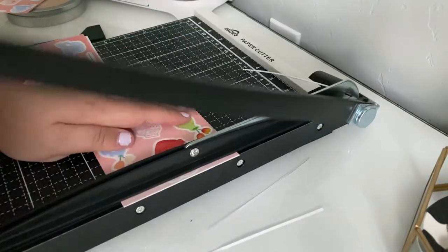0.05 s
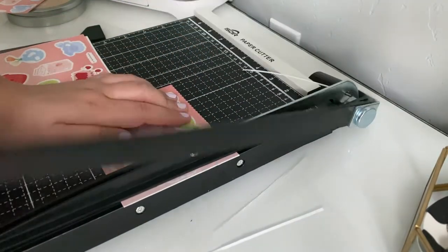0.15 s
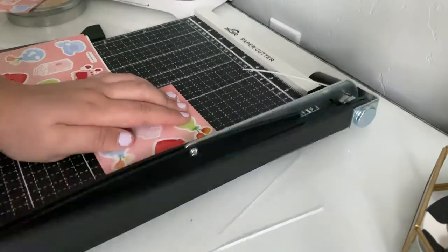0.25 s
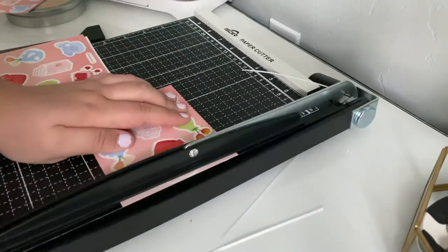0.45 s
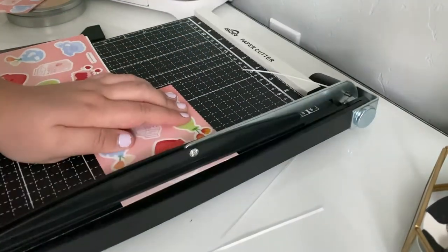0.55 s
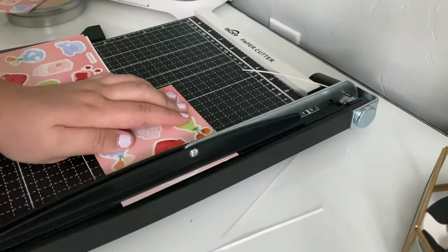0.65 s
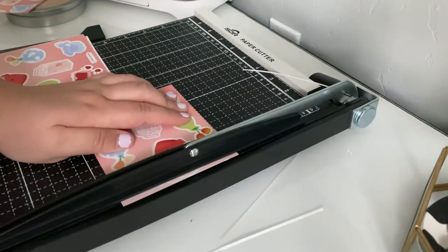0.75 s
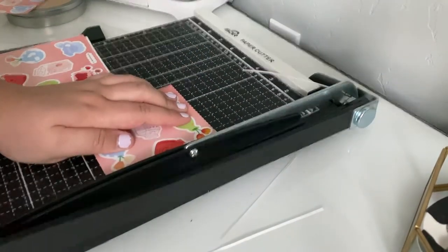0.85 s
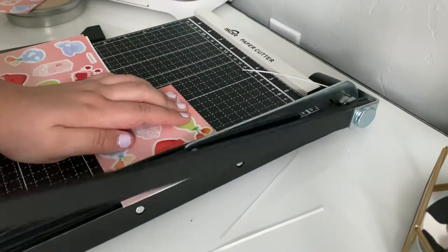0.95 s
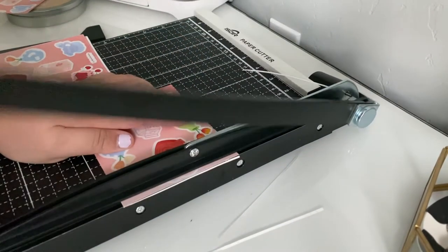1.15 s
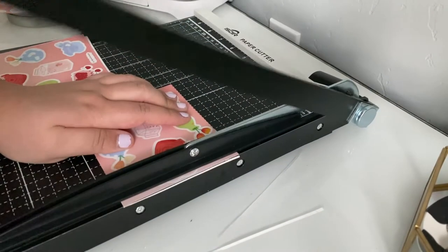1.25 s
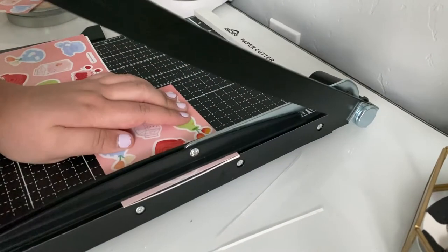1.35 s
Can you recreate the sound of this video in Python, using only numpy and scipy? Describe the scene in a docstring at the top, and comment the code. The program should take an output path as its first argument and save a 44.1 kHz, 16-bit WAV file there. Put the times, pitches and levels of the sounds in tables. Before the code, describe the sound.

Close by on a table in a small room, a paper cutter blade shears a sheet with a short crunch and thuds home. After a brief pause it lifts with a softer metallic scrape, ending in a light click.

```python
"""A guillotine paper cutter on a table, over the low noise of a small room. The blade comes down,
crunches through a sheet and thuds home at 0.35 s. The arm shifts once near 0.63 s, unsticks at 0.87 s,
scrapes back up along the steel edge and clicks at the top at 1.29 s. Throughout, the friction of the
blade rings the steel frame, and the pushes of the arm ring the hollow base."""
import sys
import numpy as np
from scipy import signal
from scipy.fft import rfft, irfft
from scipy.io import wavfile
from scipy.ndimage import uniform_filter1d

SR = 44100
rng = np.random.default_rng(int(sys.argv[2]) if len(sys.argv) > 2 else 0)


def file_out(sig):
    """Save sig as 16-bit WAV at sys.argv[1]."""
    # one column per channel
    cols = np.atleast_2d(sig).T
    # limit, then scale
    lim = np.clip(cols, -1, 1)
    pcm = np.round(lim * 32767).astype(np.int16)
    wavfile.write(sys.argv[1], SR, pcm)


N = 61739
T = np.arange(N) / SR
FFT_SIZE = 2 ** 17
HZ = np.maximum(np.arange(FFT_SIZE // 2 + 1) * SR / FFT_SIZE, 1)


def from_db(db):
    """Decibels to gain."""
    return 10 ** (np.asarray(db) / 20)


def unit_rms(x):
    """Scale to unit power."""
    return x / np.sqrt(np.mean(x ** 2) + 1e-20)


def curve_at(points, hz=HZ):
    """Read a curve on a log-frequency axis."""
    freqs, values = np.transpose(points)
    return np.interp(np.log(hz), np.log(freqs), values)


def faders(rows):
    """One smoothed gain envelope per level column, silent outside the gesture."""
    times, *columns = np.transpose(rows)
    gate = (T > times[0]) * (T < times[-1])
    return [uniform_filter1d(from_db(np.interp(T, times, db)) * gate, size=200) for db in columns]


def eq(x, db):
    """Minimum-phase EQ with the given gain at each frequency of HZ."""
    cepstrum = irfft(np.log(from_db(db)))
    cepstrum[1:FFT_SIZE // 2] *= 2
    cepstrum[FFT_SIZE // 2 + 1:] = 0
    return irfft(rfft(x, FFT_SIZE) * np.exp(rfft(cepstrum)))[..., :N]


def ring(x, hz, t60):
    """One resonator: a unit click starts a dying tone of height 1."""
    r, w = from_db(-60 / (t60 * SR)), 2 * np.pi * hz / SR
    return signal.lfilter([1, -r * np.cos(w)], [1, -2 * r * np.cos(w), r * r], x + 1e-18)


# Room tone EQ: (frequency [Hz], gain [dB])
ROOM_TONE_EQ = [(20, -29.5), (40, 2), (60, 5), (85, -21.5), (140, 2.5), (220, -3), (400, -10), (600, -21.5),
                (1200, -26.5), (2500, -34), (6000, -45), (9000, -54.5), (16000, -48.5)]
def room_tone():
    """A bed of low, steady noise, mostly alike in both ears."""
    noise = rng.standard_normal(N) + 0.56 * rng.standard_normal((2, N))
    return from_db(-48.5) * unit_rms(eq(noise, curve_at(ROOM_TONE_EQ)))


def reflections(t60):
    """A dying stereo cloud of echoes with unit energy."""
    cloud = rng.standard_normal((2, N)) * from_db(-60 * T / t60) * (T > .0005)
    return unit_rms(cloud) / np.sqrt(N)


# Colour of the early reflections and of the reverb tail: (frequency [Hz], gain [dB])
EARLY_EQ = [(100, -34), (300, -8.5), (700, -0.5), (2000, -0.5), (5000, 1.5), (10000, 5)]
TAIL_EQ = [(60, -25), (200, -12), (500, -9.5), (1500, -3.5), (5000, -12.5), (10000, -15.5), (16000, -19)]
# Reverb decay: (frequency [Hz], t60 [s])
TAIL_DECAY = [(100, 0.053), (500, 0.44), (2000, 0.31), (5000, 0.35), (12000, 0.27)]
# Stereo balance: (frequency [Hz], left minus right [dB])
BALANCE = [(60, 1.5), (180, -2), (450, 1.5), (1000, 2.5), (2500, 4), (6000, 2.5), (9000, -0.5)]
def room(close, send):
    """The close sound arrives directly and off table and wall; the send feeds a tail dying band by band."""
    edges, tail = np.geomspace(40, 17000, 9), 0
    for low, high in zip(edges, edges[1:]):
        band = signal.butter(2, [low, high], "band", fs=SR, output="sos")
        tail += signal.sosfilt(band, reflections(curve_at(TAIL_DECAY, np.sqrt(low * high))))
    reverb = signal.fftconvolve(send, eq(tail, curve_at(TAIL_EQ)), axes=1)[:, :N]
    paths = (T == 0) + eq(reflections(t60=0.022), curve_at(EARLY_EQ))
    # The paths' colour, smoothed over 80 Hz, is evened out so the close sound stays neutral.
    power = uniform_filter1d(np.abs(rfft(paths, FFT_SIZE)) ** 2, size=int(80 * FFT_SIZE / SR))
    ears = []
    for ear, side in enumerate((1, -1)):
        early = eq(signal.fftconvolve(close[ear], paths[ear])[:N], -10 * np.log10(power[ear]))
        ears.append(eq(early + reverb[ear], side * curve_at(BALANCE) / 2))
    left, right = ears
    return np.array([left, np.interp(T - 1 / SR, T, right)])   # right ear one sample late


# Rumble envelopes as the arm falls, rests and lifts: (time [s], level before trim [dB])
FALL_RUMBLE = [(0.115, -45.5), (0.179, -43.5), (0.295, -26), (0.318, -16), (0.335, -14.5)]
SHIFT_RUMBLE = [(0.46, -42), (0.576, -54), (0.648, -36.5), (0.7, -54)]
LIFT_RUMBLE = [(0.89, -30), (1.014, -36.5), (1.185, -40), (1.27, -56), (1.298, -29), (1.39, -79)]
# Rumble EQ: (frequency [Hz], gain [dB])
RUMBLE_EQ = [(25, -18.5), (55, -9), (85, -7), (120, -5.5), (170, -1), (260, -9), (360, -7), (700, -57.5)]
def base_rumble():
    """The base trembles under the moving arm, and keeps trembling while it rests and shifts."""
    out = 0
    for levels, trim_db in ((FALL_RUMBLE, -3.5), (SHIFT_RUMBLE, -0.5), (LIFT_RUMBLE, -1)):
        tremble = unit_rms(eq(rng.standard_normal(N), curve_at(RUMBLE_EQ)))
        out += from_db(trim_db) * faders(levels)[0] * tremble
    return out


# The arm's hits on the base: (time [s], push level [dB], contact time [s], knock level [dB])
BASE_HITS = [(0.316, -36, 0.0063, -48), (0.3452, -5.5, 0.0044, -0.5), (0.354, -3, 0.0031, -6.5),
             (0.399, -23, 0.0125, -44), (0.6321, -36.5, 0.0033, -17.5), (0.8766, -15.5, 0.0037, -15),
             (0.939, -18, 0.0046, -15), (1.293, -32.5, 0.0032, -39)]
# Body of the base: (frequency [Hz], gain [dB], t60 [s])
BASE_MODES = [(60.4, -46, 0.25), (112.3, -21, 0.36), (148, -13, 0.19), (175.2, -12, 0.26),
              (207.7, -15.5, 0.16), (283, -5, 0.13), (351, -16.5, 0.22), (584, -5.5, .11)]
def base_thuds():
    """Half-sine pushes shake the base, set its modes ringing and knock the hollow under it."""
    knock_hz, knock_rise_s, knock_t60_s = 395.8, 0.0063, 0.063
    push, impulse, knock = 0, 0, 0
    for start, db, contact_s, knock_db in BASE_HITS:
        pulse = -np.sin(np.pi * np.clip((T - start) / contact_s, 0, 1))
        push += from_db(db) * pulse
        impulse += from_db(db) * pulse / np.abs(pulse.sum())
        age = np.maximum(T - start, 0)
        attack = 1 - np.exp(-age / knock_rise_s)
        decay = from_db(knock_db - 60 * age / knock_t60_s)
        knock -= attack * decay * np.sin(2 * np.pi * knock_hz * age)
    body = sum(from_db(db) * ring(impulse, hz, t60) for hz, db, t60 in BASE_MODES)
    return from_db(-3) * push + knock + body


# Steel frame resonances: (frequency [Hz], gain over the plain contact [dB], t60 [s])
FRAME_MODES = [(396.7, 8, 0.088), (445.8, 2, 0.53), (519.3, 10, 0.19), (576, 12.5, 0.14), (698, 2, 0.19),
               (914.7, 1, 0.19), (948.4, 3.5, 0.041), (1195, 4, 0.049), (1562, 12.5, 0.049),
               (1703, 9, 0.11), (1907, 6.5, 0.069), (2253, 4, 0.085), (3590, -0.5, 0.14), (4560, 2, 0.064)]
def steel_frame(contact):
    """The contact itself plus the ring it draws from the frame."""
    return contact + sum(from_db(db) * 2 * np.log(1000) / (t60 * SR) * ring(contact, hz, t60)
                         for hz, db, t60 in FRAME_MODES)


# Metallic pings: (time [s], level [dB], pitch [Hz], t60 [s])
BLADE_PINGS = [(0.3075, -11.5, 5270, 0.019), (0.3335, -12.5, 2925, 0.047), (0.632, -40, 1193, .07),
               (0.869, -20.5, 2960, 0.041), (0.871, -24.5, 1590, 0.047), (0.871, -43, 1240, 0.064),
               (0.913, -26.5, 1850, 0.096), (0.924, -28.5, 1545, 0.09), (1.239, -49.5, 2485, 0.069),
               (1.2878, -26, 2400, 0.011)]
def blade_pings():
    """Where the blade catches or lets go, its free length rings at pitches set by the contact point; the faint
    ping near 1.24 s is a squeak of the spring."""
    return sum(from_db(db) * ring(np.arange(N) == int(start * SR), hz, t60)
               for start, db, hz, t60 in BLADE_PINGS)


def slips(grains_per_s=1600, spread_db=3.5, smooth_gain=0.51):
    """Grit: tiny slips and breaking fibres of uneven size, over a smooth rub."""
    sizes = from_db(spread_db * np.minimum(rng.exponential(1, N), 4)) * rng.choice([-1, 1], N)
    grains = unit_rms(sizes * (rng.random(N) < grains_per_s / SR))
    return unit_rms(grains + smooth_gain * rng.standard_normal(N))


def friction(stereo_width=0.79):
    """Slips spread along the blade, partly different in each ear."""
    return unit_rms(slips() + stereo_width * np.array([slips(), slips()]))


# Light brushes on the edge: (centre time [s], level [dB], half-length [s])
BRUSH_SWELLS = [(0.6, -61, 0.021), (0.669, -62, 0.029), (0.867, -59.5, 0.038)]
# Brush EQ: (frequency [Hz], gain [dB])
BRUSH_EQ = [(1000, 4.5), (2500, 2.5), (5000, 7.5), (8200, -4), (10800, 4), (12300, -27.5), (14500, 2.5),
            (16500, -21)]
def blade_brushes():
    """Soft swells of steel sliding on steel while the arm shifts."""
    swell = sum(from_db(db) * np.exp(-((T - centre) / half) ** 4) for centre, db, half in BRUSH_SWELLS)
    return swell * unit_rms(eq(friction(), curve_at(BRUSH_EQ)))


# Transients: (time [s], relative level [dB], fade time [s], band centre [Hz], width [octaves])
SNAPS = [(0.229, -29.5, 0.016, 1650, 4.6), (0.2377, -20, 0.0066, 9100, 3.1),
         (0.292, -14, 0.0068, 1650, 1.4), (0.3119, -20, 0.037, 2290, 3.9), (0.3183, -11.5, 0.0017, 7340, 2),
         (0.3337, -14.5, 0.012, 3170, 0.83), (0.3451, -17.5, 0.0031, 2770, 2.3),
         (0.3505, -15, 0.0023, 5000, 5.5), (0.6253, -37, 0.011, 3010, 3.2),
         (0.626, -42, 0.0091, 13300, 0.95), (0.629, -39, 0.011, 1430, 1.16),
         (0.8678, -17.5, 0.0052, 5160, 1.9), (0.871, -27, 0.026, 1460, 3.4), (0.915, -25.5, 0.011, 2000, 3),
         (1.016, -45, .013, 14000, 0.33), (1.0222, -27.5, 0.0032, 4960, 0.5),
         (1.0365, -36.5, 0.0017, 9000, 0.86), (1.052, -40, 0.0011, 11000, .7),
         (1.2869, -32.5, 0.00074, 13000, 1.5), (1.287, -29, 0.0011, 4260, 0.79),
         (1.2862, -27.5, 0.0038, 810, 1.1), (1.306, -38, 0.0082, 3930, 1.4)]
# EQ shared by all transients: (frequency [Hz], gain [dB])
SNAP_EQ = [(100, 26.5), (400, 7), (900, 13), (1400, -0.5), (2500, -2), (5000, -3), (7200, -6.5),
           (8600, -11), (10500, -4.5), (12300, -34.5), (14500, -8), (16500, -23.5)]
def snaps_and_clicks():
    """Paper snaps, steel clicks and rasps: hard-edged bursts of friction, each in its own register."""
    out, rub = 0, eq(friction(), curve_at(SNAP_EQ))
    for start, db, fade_s, hz, octaves in SNAPS:
        band = np.clip(hz * 2 ** (np.array([-1, 1]) * octaves / 2), 20, SR * .45)
        burst = signal.sosfilt(signal.butter(1, band, "band", fs=SR, output="sos"), rub)
        burst = signal.sosfilt(signal.butter(1, band[0] / 2, "high", fs=SR, output="sos"), burst)
        envelope = (T > start) * np.exp(-((T - start) / fade_s) ** 2 / 2)
        out += from_db(db) * envelope * unit_rms(burst) / 2
    return out


# Faders of the cut and the return, before trim: (time [s], groan [dB], crunch [dB], hiss [dB])
CUT_LEVELS = [(0.03, -67.5, -86.5, -99), (0.092, -61.5, -68.5, -75), (0.212, -37.5, -53, -66.5),
              (0.226, -35.5, -53, -56), (0.232, -27, -42, -43.5), (0.252, -18, -31.5, -39),
              (0.264, -32, -30.5, -37.5), (0.302, -21, -19.5, -40.5), (0.314, -37.5, -29.5, -41)]
RETURN_LEVELS = [(0.9, -50, -41.5, -57), (0.918, -29, -28, -43), (0.992, -40, -48, -63),
                 (1.03, -39, -48, -59), (1.076, -42, -62.5, -71), (1.26, -59.5, -58, -65.5),
                 (1.28, -74, -56, -69)]
# EQs of the frame's groan, the crunch and the edge hiss: (frequency [Hz], gain [dB])
GROAN_EQ = [(200, -22.5), (330, -10.5), (450, 9.5), (600, -14.5), (850, -2), (1150, -8.5), (1450, -20),
            (2200, -52.5)]
CRUNCH_EQ = [(700, 0.5), (1300, -20), (1750, 2), (2400, -1.5), (3400, 4), (5500, -2.5), (7300, 1),
             (9000, -15.5)]
HISS_EQ = [(4000, -11), (7000, 2), (8500, 0), (9400, 7), (11200, 7), (12300, -8), (13400, 0), (15000, 2.5),
           (16500, -22)]
def blade_stroke(levels, trims_db, judder_db, judders_per_s=300):
    """The blade judders along the edge: one friction drives the groan, crunch and hiss layers."""
    judder = np.interp(T * judders_per_s, np.arange(2000), rng.standard_normal(2000))
    out, rub = 0, friction() * from_db(judder_db * judder)
    for fader, trim_db, colour in zip(faders(levels), trims_db, (GROAN_EQ, CRUNCH_EQ, HISS_EQ)):
        layer = eq(rub, curve_at(colour))
        out += from_db(trim_db) * fader * layer / np.std(steel_frame(layer))   # level set after the frame
    return out


def scene():
    """The mix: the ring of frame and blade stays close up, while scrape and base also feed the reverb."""
    cut = blade_stroke(CUT_LEVELS, trims_db=(0.5, 2, 5.5), judder_db=0.5)
    lift = blade_stroke(RETURN_LEVELS, trims_db=(-0.5, -1.5, 3), judder_db=1.7)
    contact = cut + lift + snaps_and_clicks() + blade_brushes()
    base = base_thuds() + base_rumble()
    close = steel_frame(contact) + blade_pings() + base
    return room(close, send=contact + base) + room_tone()


def record(dry):
    """The microphone drops the deepest bass; any peak over 0.9 is clipped and the top is cut."""
    low_cut = signal.butter(4, 53.4, "high", fs=SR, output="sos")
    high_cut = signal.ellip(10, .2, 80, 16000, fs=SR, output="sos")
    clipped = np.clip(signal.sosfilt(low_cut, dry), -.9, .9)
    return signal.sosfilt(high_cut, clipped)


dry = scene()
out = record(dry)
file_out(out)
```